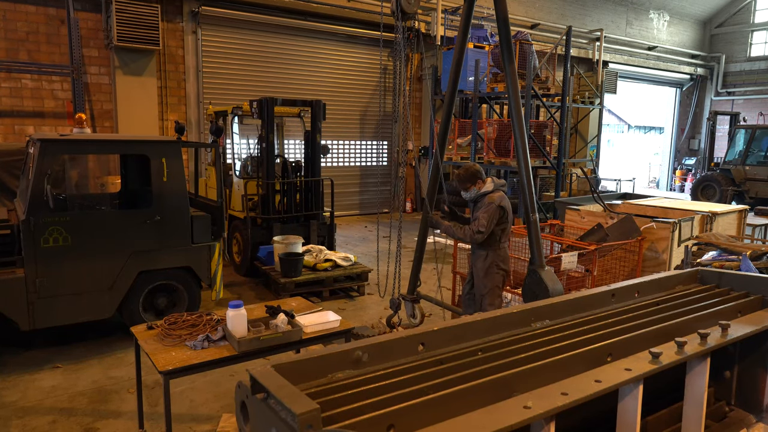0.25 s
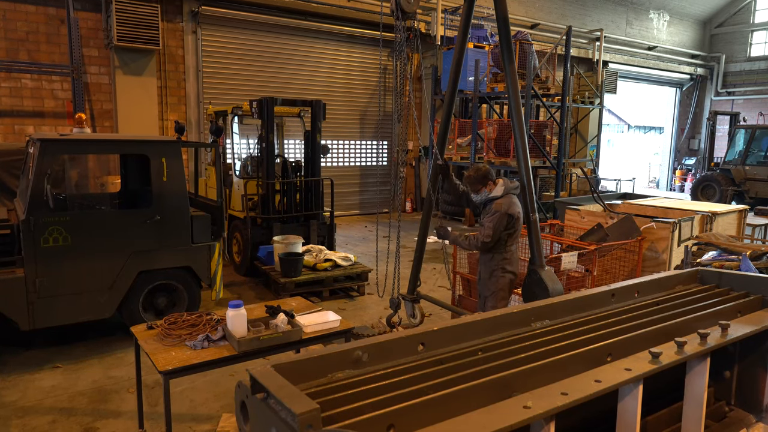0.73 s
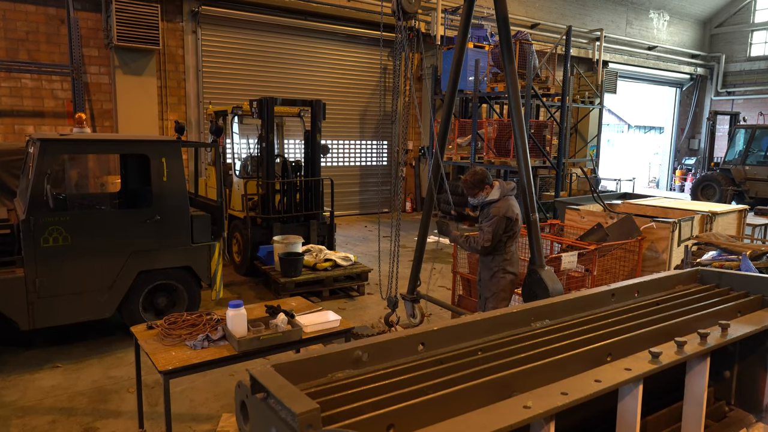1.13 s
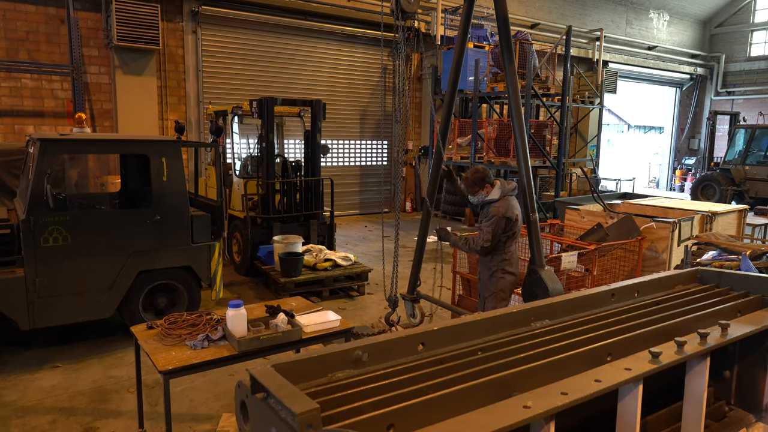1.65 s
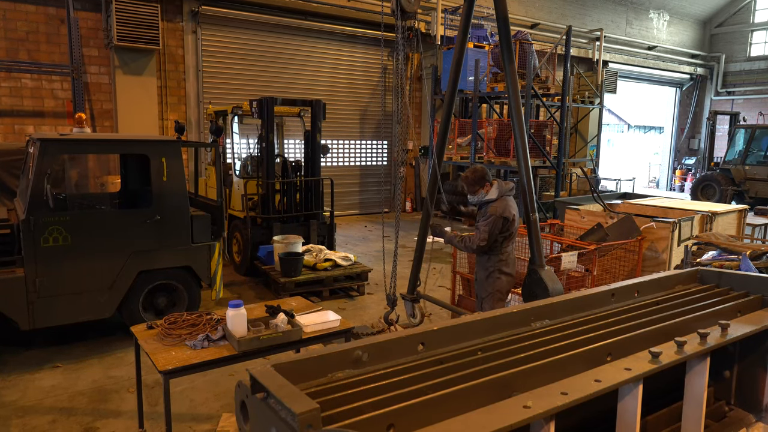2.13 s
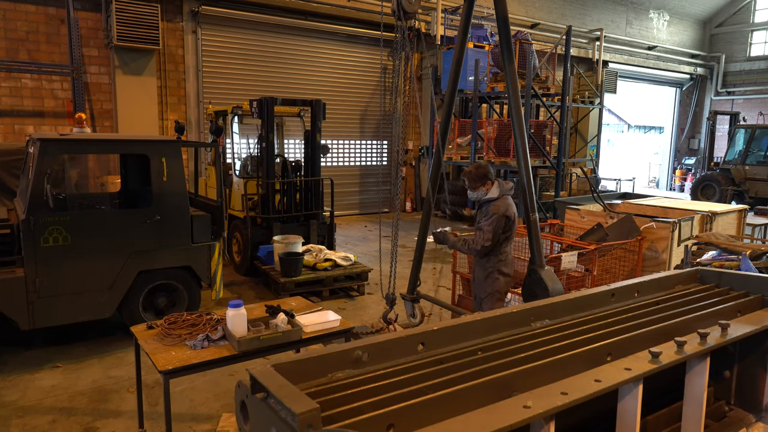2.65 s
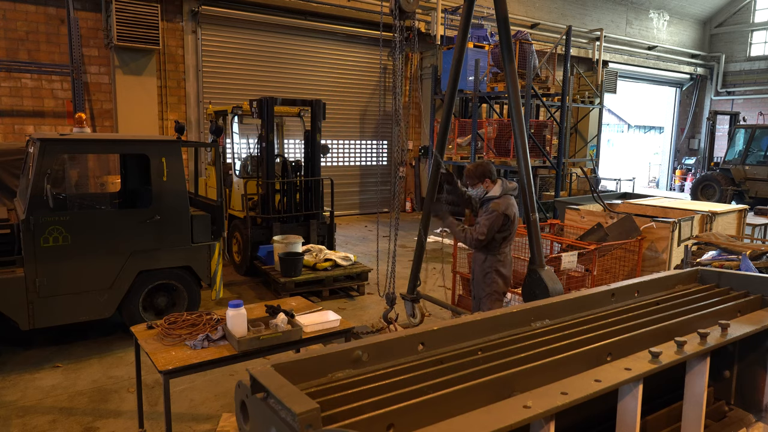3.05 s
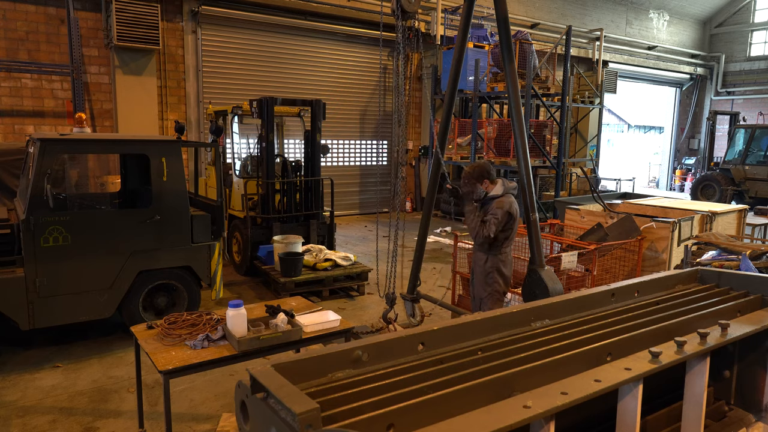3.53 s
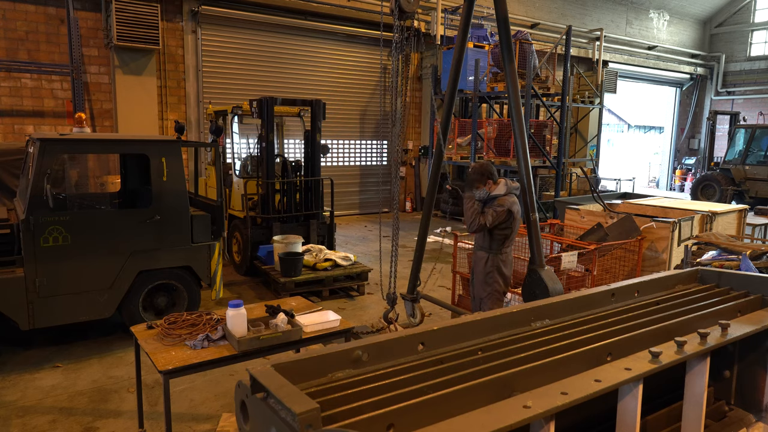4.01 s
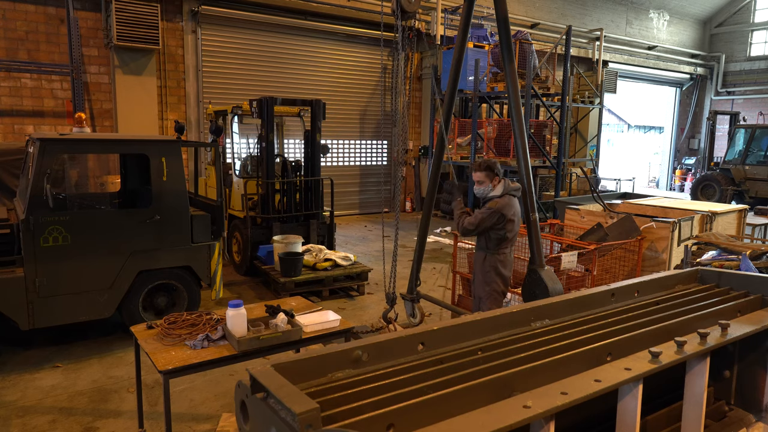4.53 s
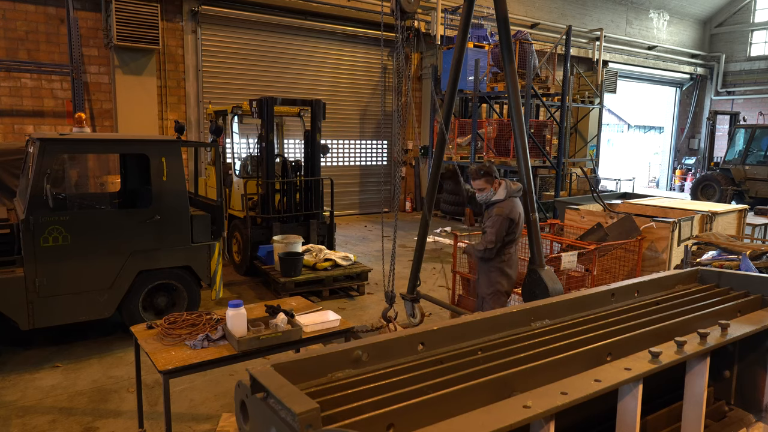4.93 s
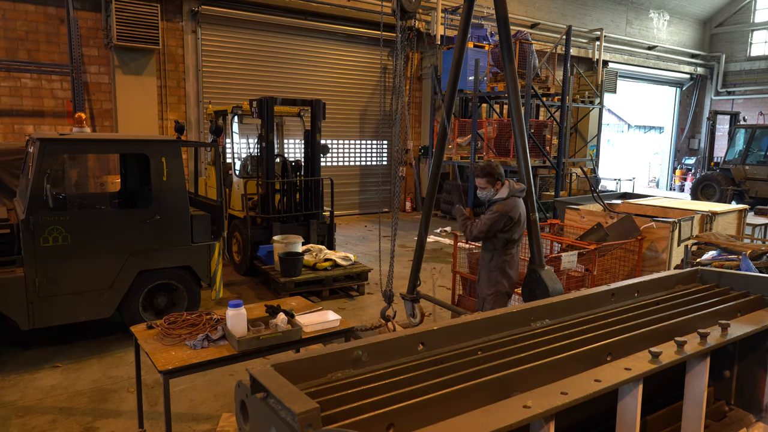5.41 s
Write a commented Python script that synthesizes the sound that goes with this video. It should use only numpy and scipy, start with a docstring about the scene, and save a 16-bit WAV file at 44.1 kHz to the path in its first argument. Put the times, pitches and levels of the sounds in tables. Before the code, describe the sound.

A faint chain rustle and a clink open over the low, steady rumble of a large workshop. Almost at once a hand chain hoist starts lifting: rapid, bright ratchet clicks speed up and slow down with each pull, while links rattle through the block and the gears grumble. Four pulls peak at about 0.5, 1.2, 2.0 and 2.7 seconds. Near the height of each, the chain strikes the steel housing with ringing clunks, strongest around 2 seconds. The clicking slows and stops by 3.5 seconds. In the rest, the chain clinks and ticks softly, with a light ring against the hook near 3.7 seconds. Hauling resumes at about 4.4 seconds, with two more pulls peaking near 5.0 and 5.4 seconds, again with clunks, running on to the end at about 5.7 seconds. The far walls add a clear reverberation to the hoist.

```python
"""A faint chain rustle and a clink sound over a large workshop's rumble; then a hand chain hoist lifts
a steel load: four pulls, a rest, two more pulls. The brake pawl clicks once per ratchet tooth as the
wheel speeds up and slows down. Colliding links rattle through the block, the gears grumble, and near
the height of each pull the chain strikes the steel housing, which clunks in its natural modes.
In the rest the chain clinks softly. The far walls reflect the sound of the hoist."""
import sys
import numpy as np
from scipy import signal
from scipy.fft import rfft, irfft
from scipy.io import wavfile

SR = 44100
rng = np.random.default_rng(int(sys.argv[2]) if len(sys.argv) > 2 else 0)


def master(y):
    """Save y as 16-bit WAV."""
    cut = np.clip(np.atleast_2d(y).T, -1, 1)
    pcm = np.round(cut * 32767)  # scale
    wavfile.write(sys.argv[1], SR, pcm.astype(np.int16))


N = 250047
TIME = np.arange(N) / SR


def amp(db):
    """Amplitude ratio of a level in decibels."""
    return 10 ** (np.asarray(db) / 20)


def unit_rms(x):
    """Normalisation to unit mean power."""
    return x / np.sqrt(np.mean(x ** 2) + 1e-20)


def curve_at(points, hz):
    """Interpolation on a logarithmic frequency axis."""
    f, value = np.transpose(points)
    return np.interp(np.log(hz + 1), np.log(f + 1), value)


def add(mix, s, sound):
    """Superposition: a sound joins the mix at s seconds."""
    part = mix[max(round(s * SR), 0):][:len(sound)]
    part += sound[:len(part)]


def colour(x, spectrum, size=4096):
    """Spectral shaping by a minimum-phase filter of unit energy."""
    log_gain = np.log(amp(curve_at(spectrum, abs(np.fft.fftfreq(size, 1 / SR)))))
    taps = np.fft.ifft(np.exp(np.conj(signal.hilbert(log_gain)))).real[:size // 2]
    return signal.oaconvolve(x, taps / np.linalg.norm(taps))[:len(x)]


def decay(t, t60):
    """Exponential damping: 60 dB in t60 seconds."""
    return np.exp(-np.log(1000) * t / t60)


def ring(hz, t60, size=16000):
    """Free vibration of one damped mode."""
    t = TIME[:size]
    return np.sin(2 * np.pi * hz * t) * decay(t, t60)


def burst(t60, size=16000):
    """The damped broadband noise of an impact."""
    return rng.standard_normal(size) * decay(TIME[:size], t60)


def impacts(per_s, spread_db):
    """A Poisson train of impulses of uneven size."""
    pulses = (rng.random(N) < per_s / SR) * rng.choice([-1, 1], N)
    return pulses * amp(spread_db * np.clip(rng.standard_normal(N), -2, 2))


# Rumble of the building. Each row: frequency in Hz, relative spectral level in dB.
RUMBLE_SPECTRUM = [(10, -28), (28, -67), (45, 0), (60, -5), (80, -20), (125, -10.5), (300, -10), (700, -14),
                   (1500, -18), (4000, -30), (8000, -34), (16000, -53)]
# Distant machinery. Each row: frequency in Hz, level in dB.
HUM_TONES = [(27, -62), (80.7, -70), (317.6, -70.5)]

def workshop(rumble_db=-61):
    """Background noise: steady machine tones over the building's continuous spectrum."""
    hum = sum(np.sqrt(2) * amp(db) * np.sin(2 * np.pi * (hz * TIME + rng.random()))
              for hz, db in HUM_TONES)
    gain = amp(curve_at(RUMBLE_SPECTRUM, np.fft.rfftfreq(N, 1 / SR)))
    rumble = irfft(rfft(rng.standard_normal(N)) * gain, N)
    return amp(rumble_db) * unit_rms(rumble) + hum


# Scraping links. Each row: frequency in Hz, relative spectral level in dB.
SCRAPE_SPECTRUM = [(300, -53), (1000, -56), (1700, 0.5), (2300, -18), (3100, 10), (4100, 5), (5000, -6),
                   (7000, -28), (10000, -16), (16000, -45)]

def chain_rustle(level_db=-57, t60=1.0):
    """Friction noise dies away as the hanging chain is taken up."""
    return amp(level_db) * colour(rng.standard_normal(N), SCRAPE_SPECTRUM) * decay(TIME, t60)


def link(hz, t60, pair_ratio=1.09, pair_db=-4, overtone_ratio=1.9, overtone_db=-14):
    """A struck link vibrates in two close bending modes and an overtone."""
    bending = ring(hz, t60) + amp(pair_db) * ring(hz * pair_ratio, t60)
    return bending + amp(overtone_db) * ring(hz * overtone_ratio, t60)


# Link striking link. Each row: start in seconds, relative level in dB, pitch in Hz.
LINK_STRIKES = [(0.0862, -29.5, 4050), (0.206, -21.5, 3860), (0.269, -22, 3520), (0.4417, -22, 3500),
                (0.516, -24, 4230), (0.6496, -17, 2930), (1.04, -17, 3220), (1.2222, -13, 3630),
                (1.538, -23, 3000), (1.8271, -17, 3640), (2.5873, -18, 3800), (2.7444, -15, 3670),
                (2.8746, -20, 3000), (2.9452, -14.5, 3570), (3.7224, -29, 3570), (4.3195, -33, 3700),
                (4.416, -32.5, 4360), (4.5086, -21, 3610), (4.6563, -19, 3310), (4.7354, -14.5, 3750),
                (4.867, -12, 3570), (4.919, -20, 3210), (5.3189, -14, 3640)]
# Dry ticks of the chain. Each row: start in seconds, relative level in dB.
CHAIN_TICKS = [(0.3635, -22), (1.378, -12), (1.999, -6), (2.03, -20), (2.0604, -9), (3.3914, -21),
               (3.467, -24.5), (3.721, -24), (3.7486, -21), (3.999, -31), (4.0068, -35), (4.0442, -42),
               (4.1165, -41), (5.413, -22)]
# Timbre of a tick. Each row: frequency in Hz, relative spectral level in dB.
TICK_SPECTRUM = [(1500, 0), (4000, -6), (7500, -1), (12000, -4), (16000, -7.5)]

def clinks(level_db=-8, t60=0.045, contact_db=-4, contact_t60=0.079, tick_db=-7, tick_t60=0.013):
    """Impact excitation: single links ring and scrape when struck, or tick as they settle."""
    rings, contacts, ticks = np.zeros((3, N))
    for s, db, hz in LINK_STRIKES:
        add(rings, s, amp(db) * link(hz, t60))
        add(contacts, s, amp(db) * burst(contact_t60))
    for s, db in CHAIN_TICKS:
        tick = burst(tick_t60)
        add(ticks, s, amp(db) * tick / abs(tick).max())
    strikes = rings + amp(contact_db) * colour(contacts, SCRAPE_SPECTRUM)
    return amp(level_db) * strikes + amp(tick_db) * colour(ticks, TICK_SPECTRUM)


def wheel_speed(haul):
    """Tooth-passing frequency during one spell of hauling, zero outside it."""
    return np.interp(TIME, *np.transpose(haul), left=0, right=0)


# Ratchet speed, one list per spell of hauling; a pull is one rise and fall.
# Each row: time in seconds, speed in teeth per second.
HAUL_SPEEDS = [
    [(0.106, 29.4), (0.46, 72.3), (0.91, 30.4), (1.03, 58.4), (1.27, 63.4), (1.68, 11.5), (2.01, 92.7),
     (2.22, 69.0), (2.53, 40.1), (2.73, 79.1), (3.14, 28.7), (3.19, 19.7), (3.49, 9.9)],
    [(4.449, 13.1), (4.66, 66.5), (4.71, 61.3), (4.97, 89.6), (5.27, 58.1), (5.42, 85.5), (5.67, 70.0)],
]
# The wheel slips one tooth as the chain is taken up again. Each row: start in seconds, relative dB.
TOOTH_SLIPS = [(4.247, -27.5)]
USUAL_TEETH_PER_S = 60

def tooth_falls(level_db=-25, speed_power=0.2, ease_db=-1, ease_s=0.12):
    """Times and levels of the pawl's falls: one per tooth, growing as a power of wheel speed."""
    falls = list(TOOTH_SLIPS)
    for haul in HAUL_SPEEDS:
        speed = wheel_speed(haul)
        teeth_passed = np.ceil(np.cumsum(speed) / SR)
        at = np.flatnonzero(np.diff(teeth_passed)) + 1
        speed_db = speed_power * 20 * np.log10(speed[at] / USUAL_TEETH_PER_S)
        slack_db = ease_db * np.exp(-(TIME[at] - TIME[at[0]]) / ease_s)  # gentler until the chain is taut
        falls += zip(TIME[at], level_db + speed_db + slack_db)
    return np.transpose(falls)


def struck(modes, envelope, count, spread_db=2.5):
    """Modal superposition, one ring a row: each tooth is hit at a new spot, so the modes mix anew."""
    hz, db = np.transpose(modes)
    shape = (count, len(hz))
    gains = amp(db + spread_db * rng.standard_normal(shape))
    phases = np.exp(2j * np.pi * rng.random(shape))
    tones = np.exp(2j * np.pi * hz[:, None] * TIME[:len(envelope)])
    return np.sqrt(2) * ((gains * phases) @ tones).real * envelope / np.linalg.norm(amp(db))


# Modes of pawl and ratchet wheel. Each row: frequency in Hz, relative level in dB.
RATCHET_MODES = [(5276, -79), (5728, -43), (7569, -45), (8296, -40), (9028, -45), (9572, -39),
                 (9851, -41.5), (10794, -43), (11660, -45), (12080, -45), (12958, -46), (14271, -31),
                 (15138, -46)]
# Lower modes of the pawl's arm and the brake. Each row: frequency in Hz, relative level in dB.
ARM_MODES = [(762, -24.5), (1083, -18.5), (2130, -8.5), (3900, -0.5), (4104, -4), (4230, 1), (4300, -2.5),
             (4400, -3.5)]
# The pawl's dry snap. Each row: frequency in Hz, relative spectral level in dB.
SNAP_SPECTRUM = [(200, -14), (500, -9), (1400, -6), (2300, -2), (3200, -2), (4200, 5), (5100, -2),
                 (5850, 0), (7000, -3), (8200, 0), (9700, 2), (10400, -4), (13900, -2), (14350, 4),
                 (14650, 3), (15000, -6)]

def pawl(ring_db=-4, ring_t60=0.047, arm_db=-9, arm_t60=0.036, snap_db=-5.5, snap_t60=0.065,
         chatter_s=0.0052, rise_s=0.000089, uneven_db=0.95):
    """Forced, then free vibration: the pawl chatters briefly on each tooth, then the parts ring out."""
    times, db = tooth_falls()
    t = TIME[:6000]
    attack = 1 - np.exp(-t / rise_s)
    free_s = np.maximum(t - chatter_s, 0)
    rings = amp(ring_db) * struck(RATCHET_MODES, attack * decay(free_s, ring_t60), len(times))
    rings += amp(arm_db) * struck(ARM_MODES, attack * decay(free_s, arm_t60), len(times))
    snaps = rng.standard_normal(rings.shape) * attack * decay(free_s, snap_t60)
    gains = amp(db + uneven_db * rng.standard_normal(len(db)))
    ringing, snapping = np.zeros((2, N))
    for s, gain, tone, snap in zip(times, gains, rings, snaps):
        add(ringing, s, gain * tone)
        add(snapping, s, gain * snap)
    return ringing + amp(snap_db) * colour(snapping, SNAP_SPECTRUM)


def shaking(level_db=-34.5, speed_power=0.93, lag_s=0.011):
    """First-order lag: the chain's shaking follows the wheel's speed a moment late."""
    speed = sum(wheel_speed(haul) for haul in HAUL_SPEEDS) / USUAL_TEETH_PER_S
    pole = np.exp(-1 / (lag_s * SR))
    return amp(level_db) * signal.lfilter([1 - pole], [1, -pole], speed ** speed_power)


# Strength of the links' ringing by pitch. Each row: frequency in Hz, relative level in dB.
LINK_LEVELS = [(2100, -5.5), (2700, -7), (3200, 2), (3700, 5.5), (4200, -16), (4700, 14)]

def chain_rattle(shake, ring_db=-2, ring_t60=0.038, scrape_db=-7.5, scrape_t60=0.028,
                 hits_per_s=130, count=28):
    """Random collisions ring links of many pitches; their incoherent scrapes add in power."""
    rings, hit_energy = np.zeros((2, N))
    for hz in np.geomspace(2150, 4300, count) * rng.uniform(1.0, 1.01, count):
        hits = impacts(hits_per_s / count, spread_db=4)
        rings += amp(curve_at(LINK_LEVELS, hz)) * signal.oaconvolve(hits, link(hz, ring_t60))[:N]
        hit_energy += hits ** 2
    power = signal.lfilter([1], [1, -decay(1 / SR, scrape_t60) ** 2], hit_energy)
    scrape = colour(np.sqrt(power) * rng.standard_normal(N), SCRAPE_SPECTRUM)
    return shake * (amp(ring_db) * unit_rms(rings) + amp(scrape_db) * unit_rms(scrape))


# Modes of the steel housing. Each row: frequency in Hz, 60 dB decay time in seconds,
# relative level in dB when knocked, relative level in dB when the chain runs.
HOUSING_MODES = [(521.8, 0.77, -50, -4), (646, 0.19, -18.5, -24), (766.4, 0.48, -6.5, -1.5),
                 (1123, 0.057, -52, -30), (1082.4, 0.27, 9, 6), (1156, 0.4, -6, -16.5),
                 (1455, 0.31, -19.5, 0), (2117, 0.12, -52, 10), (2457, 0.21, 1, -19.5), (2452, 0.28, -6, 1),
                 (2828, 0.42, -9, 4.5)]
# Grumble of the gears. Each row: frequency in Hz, relative spectral level in dB.
GEAR_SPECTRUM = [(70, -45), (120, 0.5), (175, 10.5), (265, 20), (320, 7), (430, -12), (540, -8), (900, -18),
                 (1400, -7), (3000, -5)]

def block(shake, housing_db=-11, gears_db=-19):
    """Resonance: the running chain keeps the housing ringing while the loaded gears grumble."""
    response = sum(amp(db) * ring(hz, t60) for hz, t60, _, db in HOUSING_MODES)
    chain_force = shake * unit_rms(impacts(per_s=350, spread_db=5.3))
    ringing = signal.oaconvolve(chain_force, response / np.linalg.norm(response))[:N]
    gear_force = shake * unit_rms(impacts(per_s=900, spread_db=1.2))
    return amp(housing_db) * ringing + amp(gears_db) * colour(gear_force, GEAR_SPECTRUM)


# Shifts of the load. Each row: start in seconds, relative level in dB.
LOAD_SHIFTS = [(0.15, -45), (3.756, -49), (3.835, -49)]
# Timbre of a bump. Each row: frequency in Hz, relative spectral level in dB.
BUMP_SPECTRUM = [(60, -16), (170, -2), (280, 6), (450, -0.5), (850, 3), (1100, -2), (1600, -35),
                 (6000, -33)]

def load_bumps(t60=0.096):
    """Damped impacts: the hanging load bumps dully as it shifts."""
    bumps = np.zeros(N)
    for s, db in LOAD_SHIFTS:
        add(bumps, s, amp(db) * burst(t60))
    return colour(bumps, BUMP_SPECTRUM)


# Chain hitting the housing. Each row: start in seconds, relative ring and clatter levels in dB.
HOUSING_KNOCKS = [(0.629, -40, -29.5), (0.682, -29.5, -27), (1.289, -41, -23.5), (1.33, -33.5, -25.5),
                  (1.358, -35, -45), (1.394, -35, -24.5), (1.973, -33.5, -24), (2.0, -32, -19),
                  (2.029, -30.5, -19.5), (2.061, -31.5, -31), (2.753, -39.5, -26), (2.802, -28, -22.5),
                  (5.08, -28.5, -20.5), (5.153, -32.5, -33), (5.38, -41, -22), (5.412, -38, -20.5)]
# Clatter of a knock. Each row: frequency in Hz, relative spectral level in dB.
CLATTER_SPECTRUM = [(60, -33), (300, -50), (550, 6), (800, 1.5), (1150, 6.5), (1500, -11), (2400, 7.5),
                    (3300, 8), (5500, 3), (10000, -4), (16000, -54)]

def knocks(ring_db=-6, clatter_db=-1, clatter_t60=0.12, crack_db=3, crack_t60=0.0009):
    """Impulse response: hit by the swinging chain, the housing cracks, clatters and rings."""
    rings, clatter = np.zeros((2, N))
    t = TIME[:16000]
    fade = decay(t, clatter_t60) + amp(crack_db) * decay(t, crack_t60)
    for s, tone_db, noise_db in HOUSING_KNOCKS:
        # the point of impact shifts the pitch of each mode a little
        modes = (amp(db) * ring(hz * rng.uniform(1.0, 1.005), t60) for hz, t60, db, _ in HOUSING_MODES)
        add(rings, s, amp(tone_db) * sum(modes))
        add(clatter, s, amp(noise_db) * fade * rng.standard_normal(len(t)))
    return amp(ring_db) * rings + amp(clatter_db) * colour(clatter, CLATTER_SPECTRUM)


# Chain touching the hook. Each row: start in seconds, relative level in dB.
HOOK_STRIKES = [(3.721, -34.5), (3.75, -48)]
# Modes of the hook. Each row: frequency in Hz, relative level in dB, 60 dB decay time in seconds.
HOOK_MODES = [(3450, 0, 0.03), (3630, -3, 0.05), (3910, -9, 0.06), (4440, -4, 0.05), (7530, -12, 0.25),
              (10240, -21, 0.1)]

def hook():
    """Free vibration: the hook rings when the slack chain swings against it."""
    response = sum(amp(db) * ring(hz, t60) for hz, db, t60 in HOOK_MODES)
    rings = np.zeros(N)
    for s, db in HOOK_STRIKES:
        add(rings, s, amp(db) * response)
    return rings


# Decay of the room. Each row: frequency in Hz, reverberation time in seconds.
REVERB_TIMES = [(100, 1.2), (300, 0.24), (700, 4.9), (1800, 1.97), (4000, 1.36), (7000, 0.57),
                (14000, 0.42)]
# Timbre of the reflections. Each row: frequency in Hz, relative level in dB.
REVERB_SPECTRUM = [(100, -39.5), (700, 0.5), (1100, -10), (2000, 0.5), (3000, 2.5), (4150, 3.5),
                   (6000, 2.5), (14000, -7)]

def reverberation(x, wet_db=-5, delay_s=0.012, density=1 / 16):
    """Sparse reflections from far walls decay exponentially, the midrange lasting longest."""
    taps = rng.choice([-1., 1.], 2 * SR) * (rng.random(2 * SR) < density) * (TIME[:2 * SR] > delay_s)
    hz, t, bands = signal.stft(taps, SR, nperseg=256)
    t60 = curve_at(REVERB_TIMES, hz)[:, None]
    equal_energy = np.sqrt(2 * np.log(1000) / (density * t60 * SR))
    bands *= decay(t, t60) * equal_energy * amp(curve_at(REVERB_SPECTRUM, hz))[:, None]
    tail = signal.istft(bands, SR, nperseg=256)[1]
    return amp(wet_db) * signal.fftconvolve(x, tail)[:N]


def scene(lowest_hz=130):
    """Superposition of the hoist, its reverberation and the workshop's background."""
    shake = shaking()
    hoist = pawl() + chain_rattle(shake) + clinks() + knocks() + block(shake) + load_bumps() + hook()
    # parts this small radiate no deep bass
    hoist = signal.sosfilt(signal.butter(2, lowest_hz, "highpass", fs=SR, output="sos"), hoist)
    return (hoist + reverberation(hoist) + workshop() + chain_rustle())[None]


def record(dry, cutoff_hz=15750):
    """Band limiting: a steep low-pass filter removes the highest treble."""
    lowpass = signal.firwin(401, cutoff_hz, window=("kaiser", 9), fs=SR)
    return signal.oaconvolve(dry, lowpass[None], "same")


dry = scene()
out = record(dry)
master(out)
```